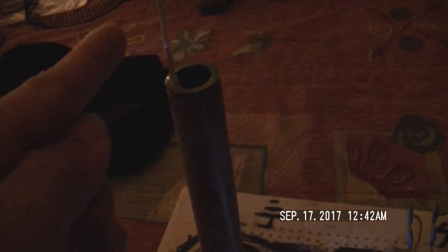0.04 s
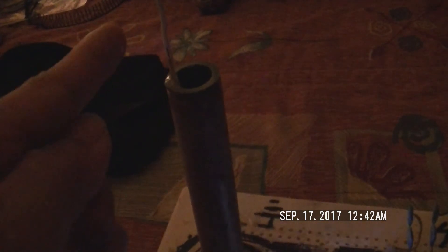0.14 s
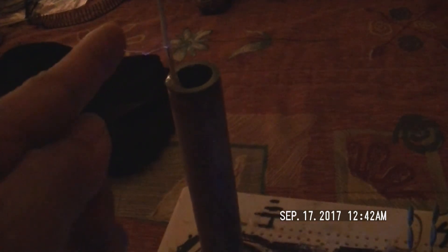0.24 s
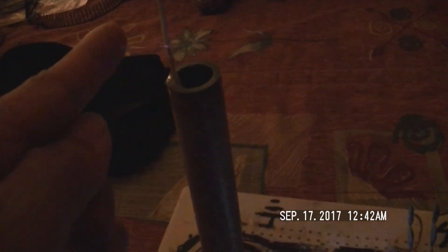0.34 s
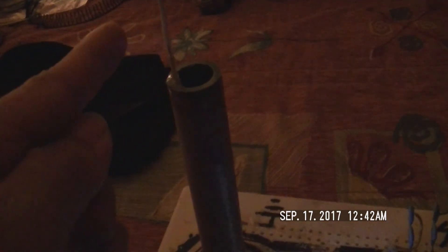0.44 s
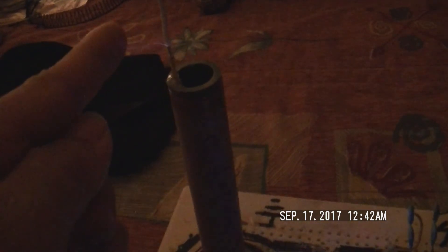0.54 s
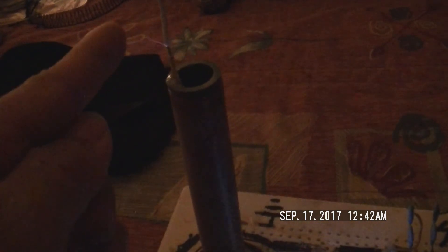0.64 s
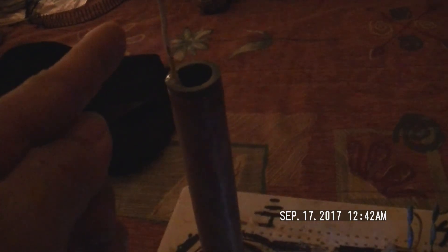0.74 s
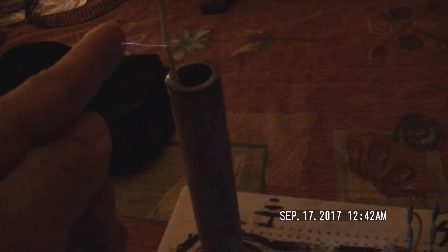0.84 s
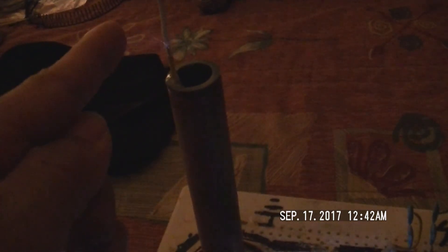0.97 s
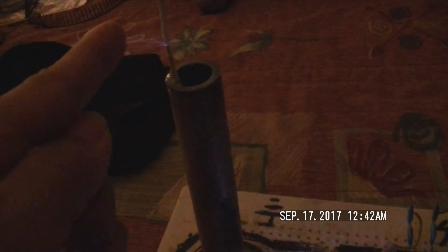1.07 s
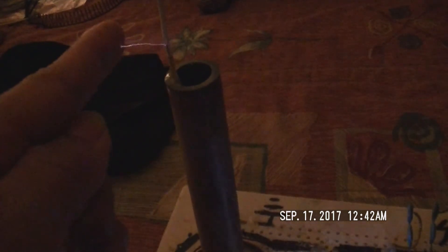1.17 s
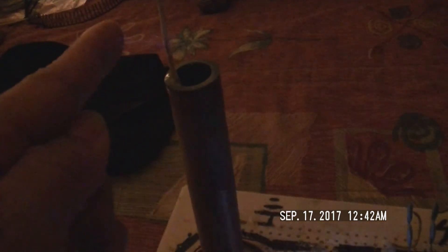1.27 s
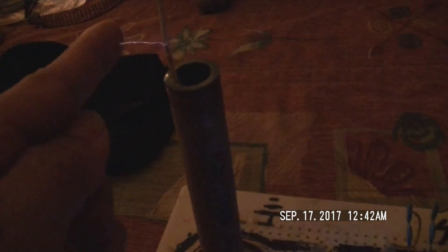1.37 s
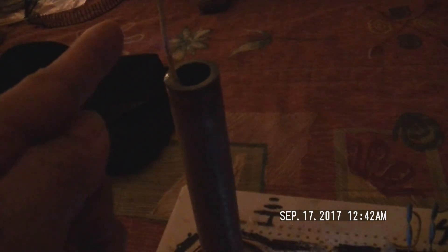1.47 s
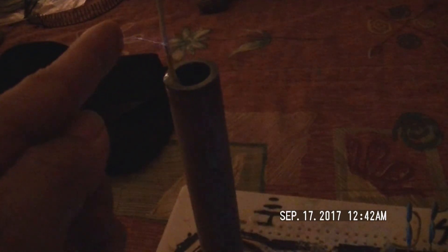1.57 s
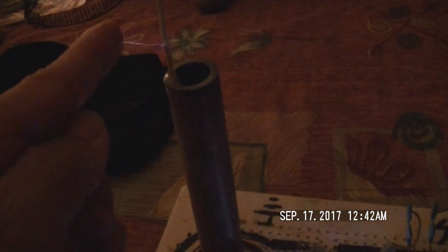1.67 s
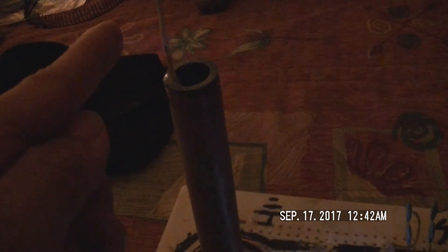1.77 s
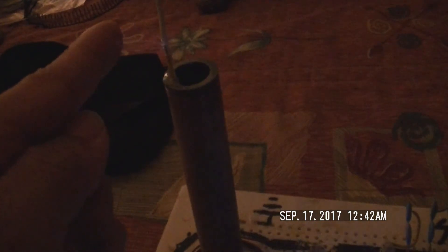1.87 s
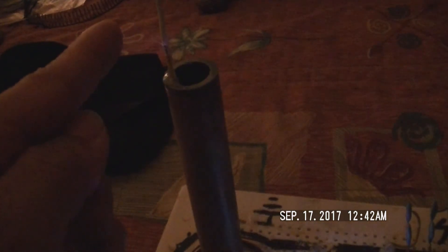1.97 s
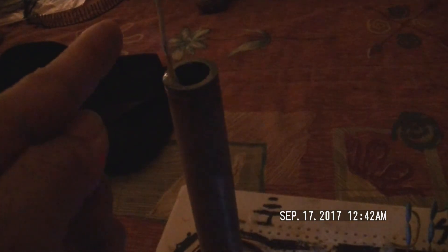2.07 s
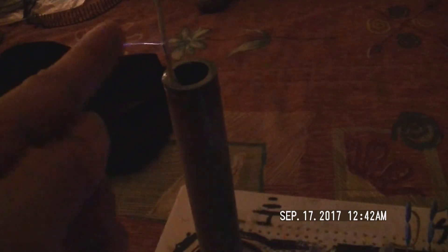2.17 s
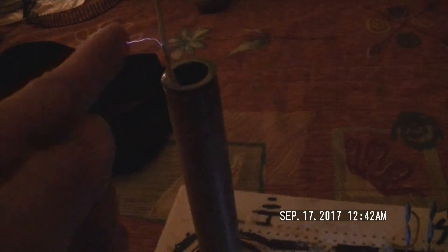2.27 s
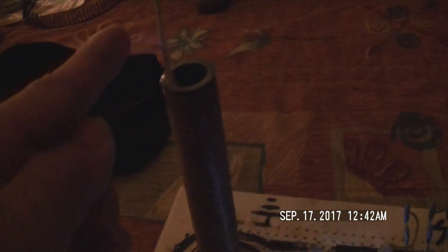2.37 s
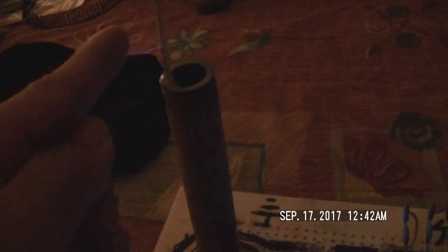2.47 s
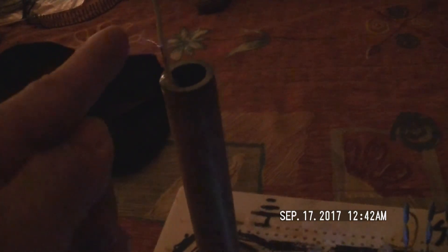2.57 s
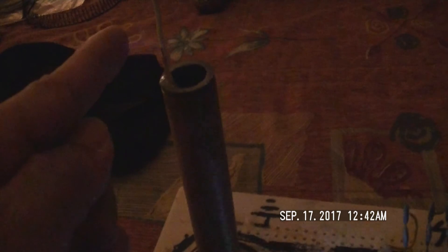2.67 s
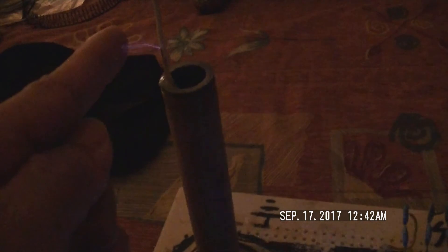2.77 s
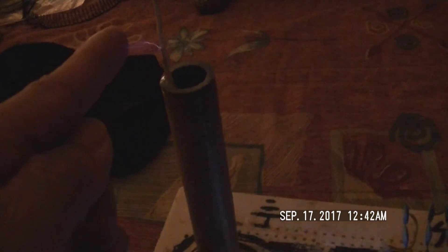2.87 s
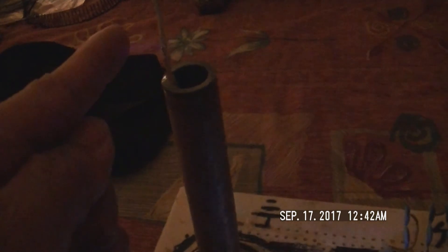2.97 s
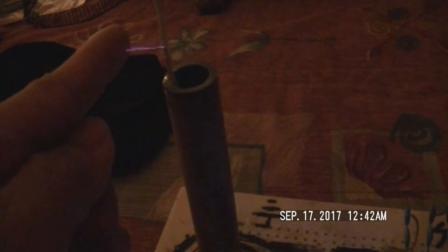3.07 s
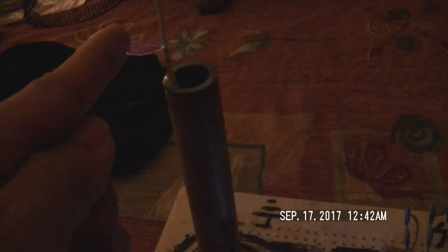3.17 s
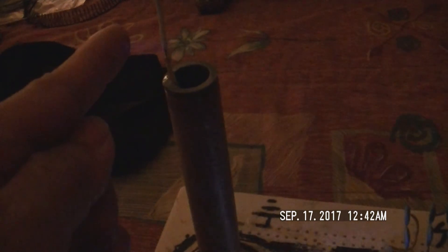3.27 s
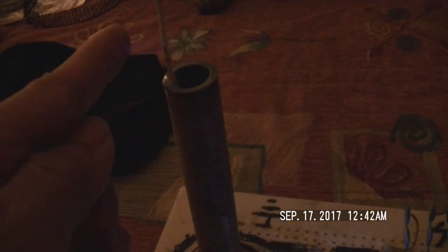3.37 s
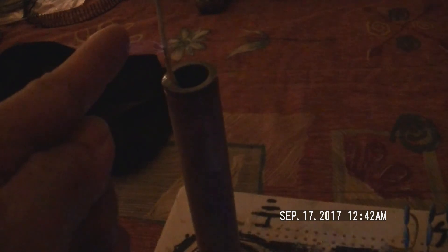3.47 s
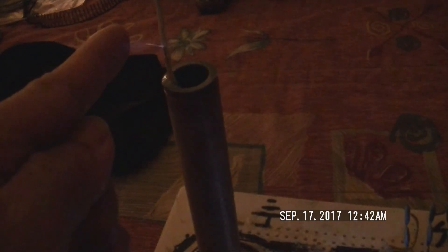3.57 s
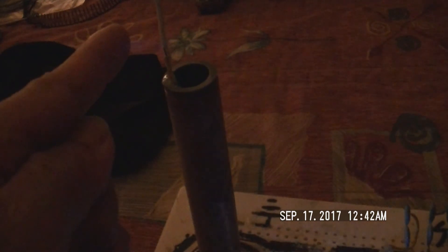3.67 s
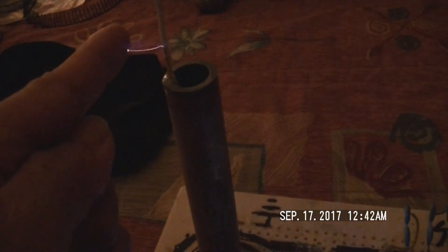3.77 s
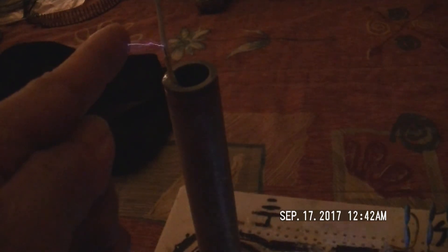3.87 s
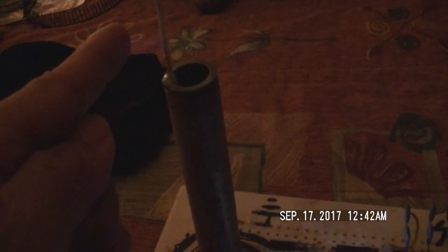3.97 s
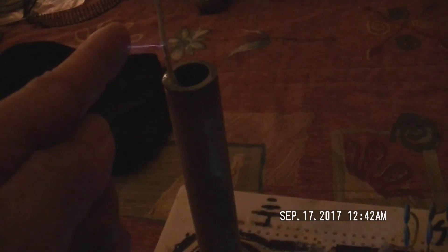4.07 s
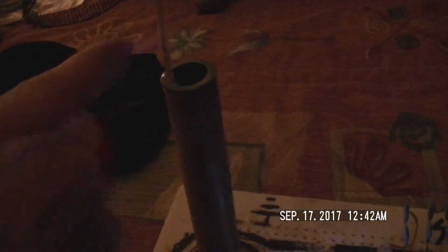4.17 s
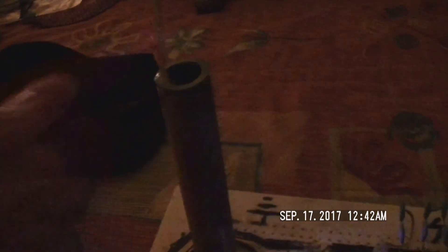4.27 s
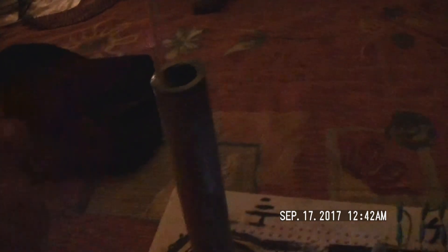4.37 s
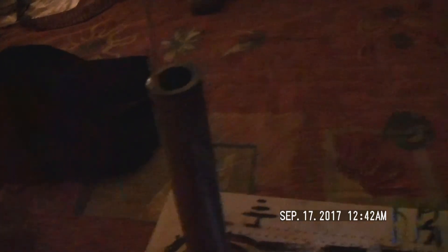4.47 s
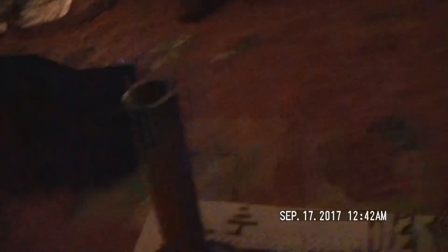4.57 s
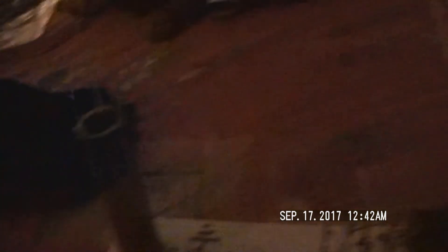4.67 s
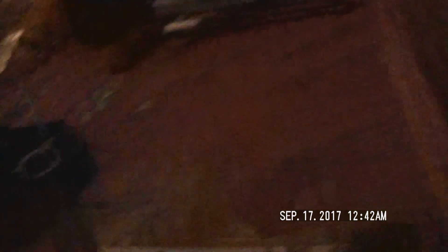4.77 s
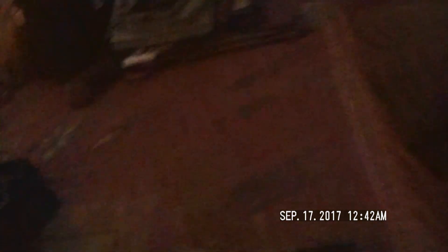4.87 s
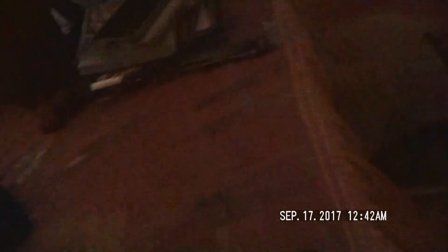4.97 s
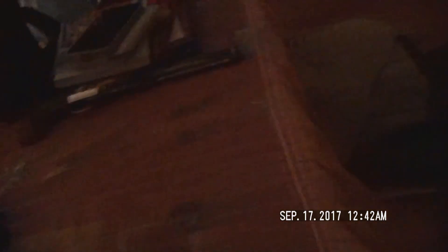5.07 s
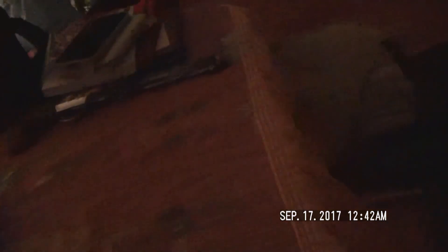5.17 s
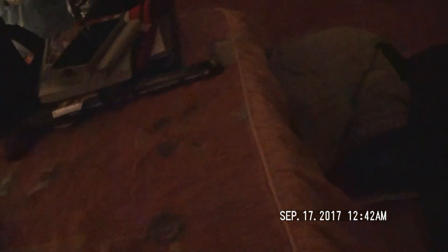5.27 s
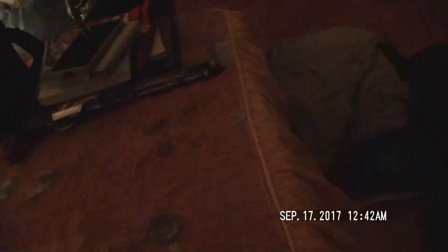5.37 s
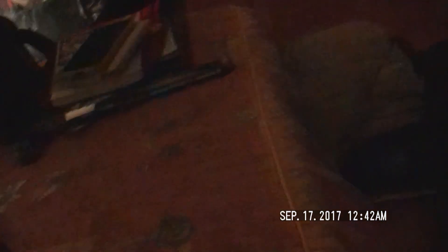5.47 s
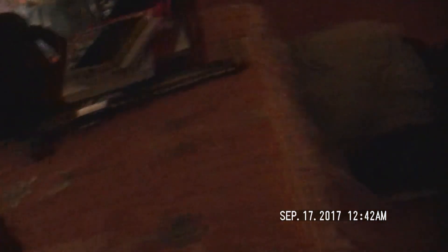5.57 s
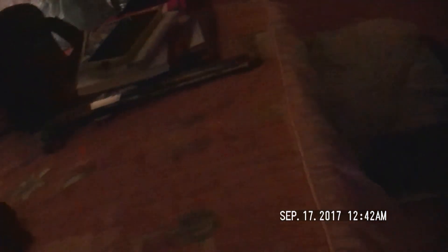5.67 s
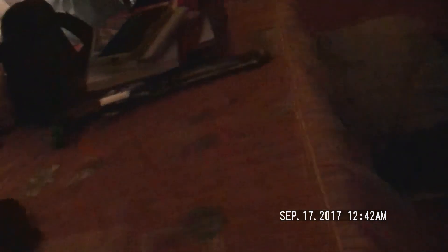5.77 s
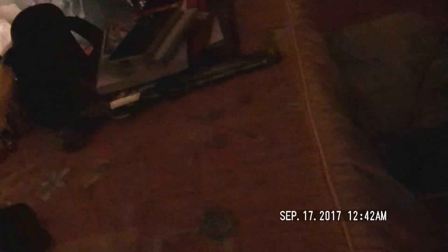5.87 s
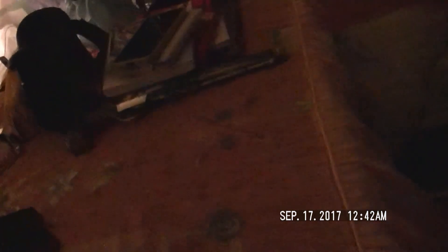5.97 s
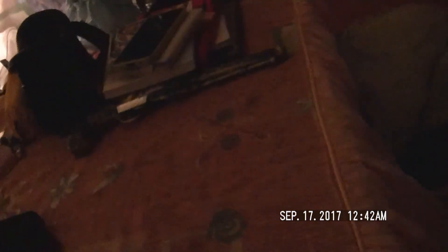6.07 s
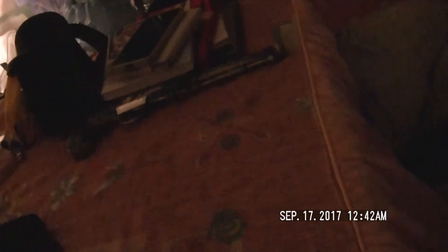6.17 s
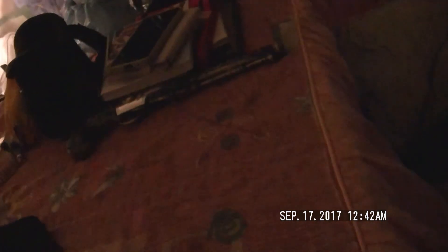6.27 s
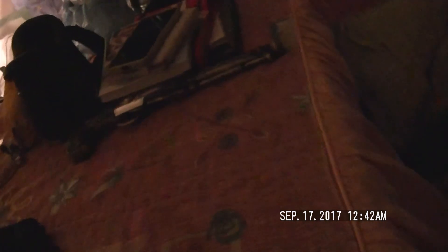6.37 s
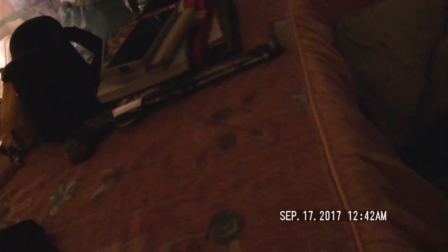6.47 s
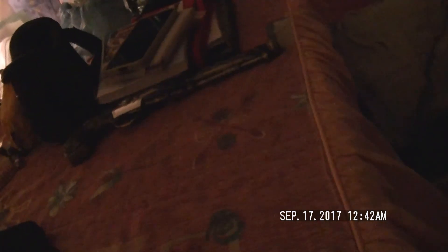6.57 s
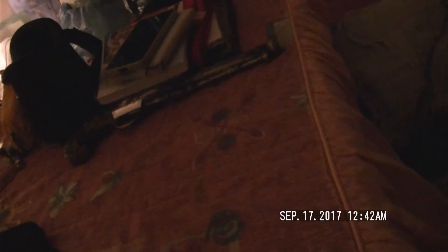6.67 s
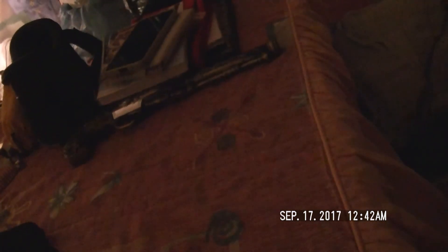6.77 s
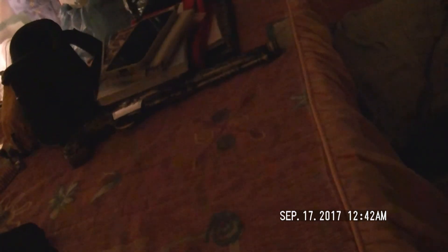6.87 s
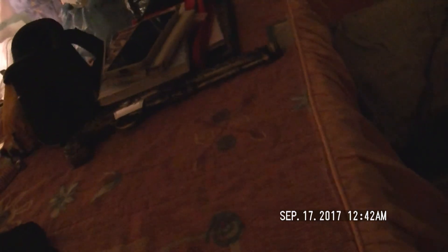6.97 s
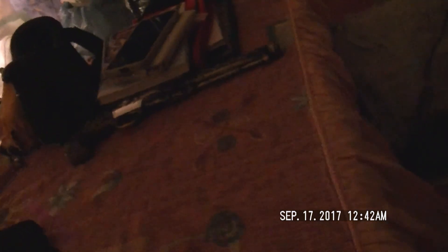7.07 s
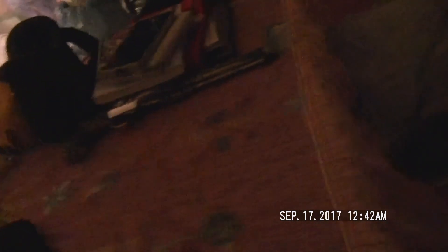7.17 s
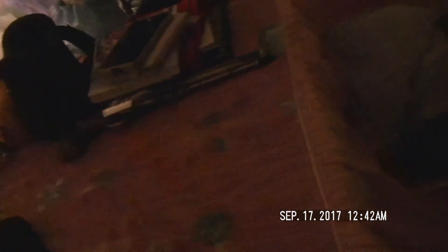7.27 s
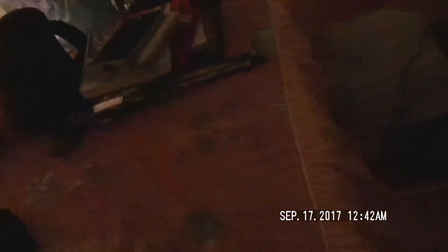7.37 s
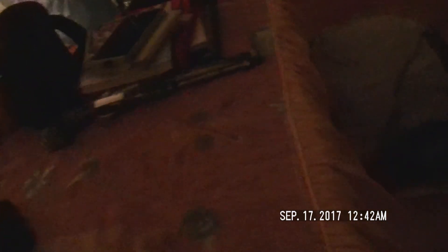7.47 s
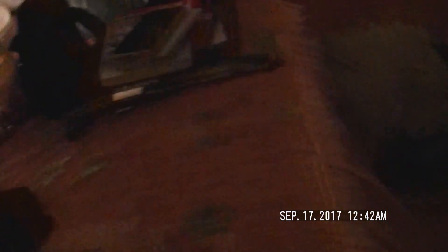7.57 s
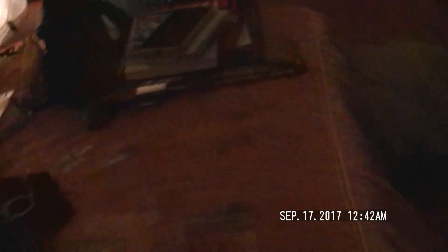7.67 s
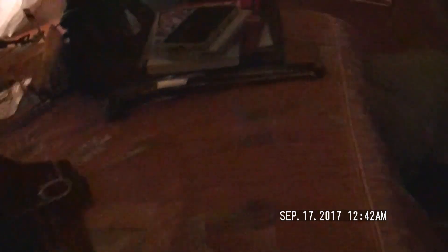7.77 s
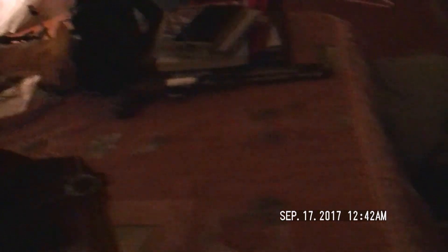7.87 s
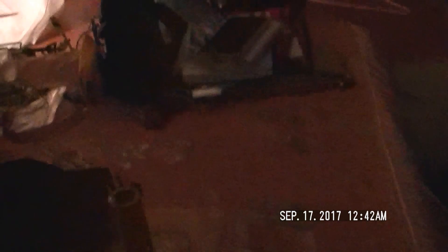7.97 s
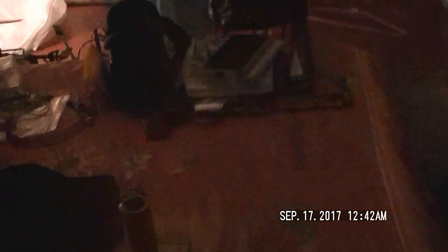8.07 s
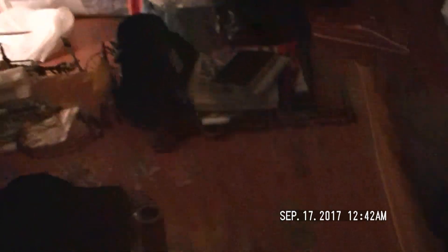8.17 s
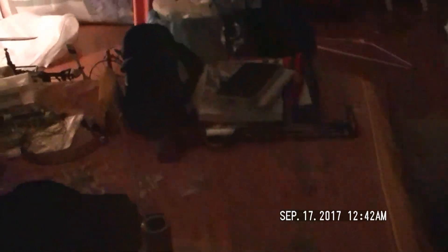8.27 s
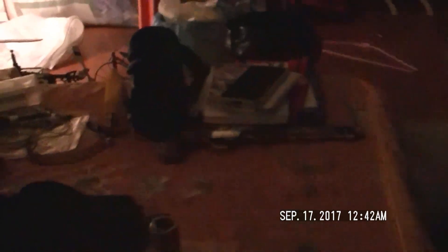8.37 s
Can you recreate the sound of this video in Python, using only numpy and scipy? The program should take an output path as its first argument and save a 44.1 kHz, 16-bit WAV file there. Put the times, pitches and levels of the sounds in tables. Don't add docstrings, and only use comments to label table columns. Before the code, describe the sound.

A steady electric arc rattles like a harsh, fast, treble-heavy zipper, each snap clicking crisply and bouncing off the table and walls. Faint low grip thumps sit underneath. As the camera microphone turns away the colour changes, lower body thinning. The arcing ends suddenly, its short room tail fades, and quiet room noise swells with low mains hum, a faint steady whine and a tiny tick and rub near the end.

```python
import sys
import numpy as np
from scipy import signal
from scipy.fft import rfft, irfft
from scipy.io import wavfile
from scipy.ndimage import uniform_filter1d

SR = 44100
rng = np.random.default_rng(int(sys.argv[2]) if len(sys.argv) > 2 else 0)


def magnitude_from_level(level_db):
    exponent = np.asarray(level_db, float) / 20
    return 10 ** exponent


def file_out(sig):
    cols = np.atleast_2d(sig).T
    lim = np.clip(cols, -1, 1)
    pcm = np.round(lim * 32767).astype(np.int16)
    wavfile.write(sys.argv[1], SR, pcm)


N = 371751
TIME = np.arange(N) / SR
SIZE = 2048
HZ = np.arange(SIZE // 2 + 1) * SR / SIZE

# (time [s], count [1])
FIRED = [(0.0216, 0), (0.1557, 5), (0.3207, 11), (0.5924, 21), (1.2639, 46), (1.4547, 53), (1.5888, 58),
         (2.1129, 77), (2.7662, 101), (3.5516, 130), (3.8527, 141), (3.9862, 146), (4.1805, 153),
         (4.784, 175), (5.112, 187), (6.4597, 236), (6.6289, 242), (6.6612, 243)]
# (time [s], heading [0-3.3], snap level [dB], left minus right [dB])
POSE = [
    (0, 0.84, 2, -1.5),
    (3.4, 0.82, 2.5, -1.5),
    (4.12, 0.78, 1.5, -1.5),
    (4.25, 1.14, 1.5, -1.5),
    (4.62, 1.02, 0.5, -2),
    (4.9, 1.55, 1.5, 1.5),
    (5.2, 1.86, 2, 1),
    (5.9, 1.9, 3.5, -4.5),
    (6.3, 2.96, 4, -1),
    (6.7, 3.3, 3.5, 0),
]
# (frequency [Hz], gain [dB])
FACING = [(250, -11.5), (700, -1), (1000, -5.5), (1500, -16.5), (2200, -6), (3200, 10), (6000, 8.5),
          (7300, 9), (9800, -3.5), (11200, 16.5), (12500, 12), (13600, 4), (15400, -3.5), (16500, -7.5)]


def curve(table, at=TIME):
    s, *columns = np.transpose(table)
    return [np.interp(at, s, c) for c in columns]


def shape(table, hz):
    f, v = np.transpose(table)
    return np.interp(np.log(np.maximum(hz, 1)), np.log(f), v)


def outside(t, start, end):
    return np.maximum(np.maximum(start - t, t - end), 0)


def unit(x):
    return x / np.sqrt(np.mean(x ** 2))


def band(x, lo_hz, hi_hz):
    return signal.sosfilt(signal.butter(2, [lo_hz, hi_hz], "band", fs=SR, output="sos"), x)


def coloured(x, table):
    n = x.shape[-1]
    return irfft(rfft(x) * magnitude_from_level(shape(table, np.arange(n // 2 + 1) * SR / n)), n)


def causal(db):
    c = irfft(db * np.log(10) / 20, axis=-1)
    c[..., 1:SIZE // 2] *= 2
    c[..., SIZE // 2 + 1:] = 0
    return np.exp(rfft(c, axis=-1))


def late(ms):
    return np.exp(-2j * np.pi * HZ * ms / 1000)


def resonance(centre_hz, width_hz):
    return 1 / (1 + 1j * (HZ ** 2 - centre_hz ** 2) / np.maximum(HZ, 1) / width_hz)


def lay(spectra, times):
    start = np.floor(times * SR).astype(int)
    fraction = (times * SR - start)[:, None]
    shift = np.exp(-2j * np.pi * np.arange(SIZE // 2 + 1) / SIZE * fraction)
    out = np.zeros(N + SIZE)
    np.add.at(out, start[:, None] + np.arange(SIZE), irfft(spectra * shift, axis=-1))
    return out[:N]


def breakdowns():
    s, count = np.transpose(FIRED)
    chance = rng.standard_normal((3, int(count[-1]) + 1))
    k = np.arange(chance.shape[1])
    times = np.interp(k, count, s) - .00015 + .0003 * chance[0] * (k < k[-1] - 1)
    return times, chance[1], chance[2]


def arc_colour(heading, facing, shrink):
    # (frequency [Hz], gain [dB])
    shifted = [(250, 3), (700, -7.5), (1000, 3.5), (1500, 2.5), (2200, 3), (3200, 8), (5900, 10.5),
               (6700, 16), (8000, 17.5), (10500, 16.5), (12000, 14.5), (13500, 3.5), (15200, 1),
               (16500, -17)]
    # (frequency [Hz], gain [dB])
    averted = [(250, -6.5), (450, -11.5), (820, -2.5), (1050, -5.5), (2000, 3), (3300, 1), (4500, -2.5),
               (6800, 1), (7500, 1), (8400, 13), (10500, 15.5), (12000, 8.5), (13500, 7.5), (15800, -5.5)]
    # (frequency [Hz], width [Hz], depth [dB])
    dips = [(950, 250, -6), (2200, 200, -13), (13600, 600, -11)]
    edge_glide, dip_glide, path_shrink = .08, .06, .165
    away = 1 - facing
    axes_hz = HZ, HZ * (1 - edge_glide * away), HZ * shrink / (1 - path_shrink)
    colour = 0
    for j, (table, hz) in enumerate(zip((FACING, shifted, averted), axes_hz)):
        share = np.clip(1 - np.abs(np.clip(heading, 0, 2) - j), 0, 1)
        colour = colour + share * shape(table, hz)
    dip_axis_hz = HZ * (1 - dip_glide * away)
    for f, width_hz, db in dips:
        colour = colour + facing * db / (1 + (2 * (dip_axis_hz - f) / width_hz) ** 2)
    knots = rng.standard_normal((len(heading), 17))
    scatter = np.array([np.interp(HZ, np.arange(17) * 1000., r) for r in knots])
    return colour + np.where(HZ > 13000, 2.2, .6) * scatter


def housing_path(facing):
    lead = .2 + .3 * facing
    holdback = -(lead + late(.19)) / (1 + lead * late(.19))
    return holdback * (1j * HZ / (150 + 1j * HZ)) ** 2


def near_echoes(facing):
    # (delay [ms], share [1, minus = inverted])
    near = [(1.55, .09), (1.82, -.07), (2.06, .05), (2.48, .06)]
    table_top = sum(share * late(ms) for ms, share in near)
    return facing * table_top - (1 - facing) * 0.085 * late(0.412) * (HZ > 7000)


def clutter_and_bounces(at, shrink):
    # (from [s], until [s], extra path before the swing [ms], level [dB])
    surfaces = [
        (0, 4.75, .785, -10),
        (4.9, 5.6, 1.44, -14),
        (6.05, 7, 1.9, -15.5),
    ]
    fade_db_per_s2 = 90
    clutter_ms = np.sort(rng.uniform(1, 4.2, 14))
    total = 0
    for j, ms in enumerate(clutter_ms):
        total = total + (-1) ** j * magnitude_from_level(-22 - 5 * ms) * late(ms * shrink)
    for start, end, ms, db in surfaces:
        level = magnitude_from_level(db - fade_db_per_s2 * outside(at, start, end) ** 2)
        total = total - level * late(ms * shrink)
    return total


def streamers(snap):
    # (time [s], level [dB])
    early = [(1.1255, -32.0), (1.3439, -37.0), (1.4506, -34.0), (2.6819, -29.0), (2.8186, -36.0),
             (3.0065, -28.0), (3.494, -29.0), (4.2886, -36.0), (4.4228, -33.0), (4.4803, -37.0),
             (4.7244, -36.0)]
    s, db = np.transpose(early)
    return lay(magnitude_from_level(db[:, None] + 14) * snap * resonance(6800, 3000), s)


def room_answer():
    # (frequency [Hz], T60 [s])
    t60 = [(300, 0.5), (2000, 0.74), (6000, 0.34), (12000, 0.24)]
    # (delay [ms], level [dB])
    arrival = [(0, -26), (3, -12), (5, -7), (8, -11), (13, 3), (17, -7), (22, -1.5), (30, -5)]
    # (delay [ms], level [dB])
    walls = [(9.4, -23.5), (10.9, 4), (13.1, -35.5), (15.9, -4), (16.3, -5), (17.4, 0.5), (18.3, -22.5),
             (18.9, -17.5)]
    # (frequency [Hz], gain [dB])
    room_colour = [(100, -17.5), (1000, -13.5), (2500, -3.5), (5000, -2), (8000, 3.5), (11000, -1),
                   (13000, -3.5), (15500, -4.5), (16000, -33.5)]
    t = np.arange(SR // 2) / SR
    tail = 0
    for hz in 125 * 2 ** np.arange(0, 7.):
        top_hz = min(hz * np.sqrt(2) * (1 + (hz > 7000)), .45 * SR)
        noise = band(rng.standard_normal((2, len(t))), hz / np.sqrt(2), top_hz)
        tail = tail + noise * magnitude_from_level(-60 * np.maximum(t - .03, 0) / shape(t60, hz))
    tail = tail * magnitude_from_level(curve(arrival, t * 1000)[0])
    for ms, db in walls:
        tail[0, int(ms * SR / 1000)] += magnitude_from_level(db) * 2
    mid, side = coloured(tail, room_colour)
    side = magnitude_from_level(-8) * band(side, 6000, 13000)
    return np.array([mid + side, mid - side])


def room(times, kick_db):
    kicks = np.zeros(N)
    kicks[(times * SR).astype(int)] = magnitude_from_level(kick_db)
    kicks[0] = kicks.max()
    turn = np.pi / 2 * curve(POSE)[0] + 0.21 * TIME
    weights = np.cos(turn), np.sin(turn)
    return sum(signal.fftconvolve((kicks * w)[None], room_answer())[:, :N] for w in weights)


def sparks():
    times, strength_chance, top_chance = breakdowns()
    at = times[:, None]
    heading, db, pan_db = (c[:, None] for c in curve(POSE, times))
    facing = np.clip(2 - heading, 0, 1)
    swing_s, settle_s, path_shrink = 4.62, .7, .165
    shrink = 1 - path_shrink * (1 - np.exp(-np.maximum(at - swing_s, 0) / settle_s))

    strength_db = db + .7 * strength_chance[:, None] - 11
    top_db = .5 * heading + 0.86 * top_chance[:, None]
    tilt_db = top_db * np.clip((HZ - 10500) / 2500, 0, 1)
    holdback = housing_path(facing)
    direct = causal(arc_colour(heading, facing, shrink) + tilt_db + strength_db) * holdback
    front = magnitude_from_level(strength_db) * causal(shape(FACING, HZ) - 4 * HZ / 10000) * holdback
    mid = lay(direct * (1 + near_echoes(facing)) + front * clutter_and_bounces(at, shrink), times)

    unlike = pan_db / 17.4 - 1j * (2 * facing - 1) * magnitude_from_level(-33)
    side = lay(direct * resonance(8700, 3000) * unlike, times)
    kick_db = -30.5 + 1.49 * heading[:, 0] + .5 * strength_chance - 13.0
    return mid + streamers(direct[0]) + side * np.array([[1], [-1]]) + room(times, kick_db)


def handling():
    # (time [s], level [dB], hold [s])
    rumble = [
        (2.52, -62, .03),
        (2.595, -63, .015),
        (3.058, -60, .03),
        (3.177, -60, 0.044),
        (3.27, -60.5, 0.058),
        (3.376, -59, .03),
        (3.528, -63, .02),
        (3.947, -68, .015),
    ]
    # (time [s], level [dB], length [s])
    rustle = [
        (7.66, -69, .04),
        (7.76, -70, .04),
        (8.157, -61, .004),
        (8.163, -66, .05),
        (8.274, -78, 0.023),
    ]
    edge_s = 0.018
    grip = unit(band(rng.standard_normal((2, N)), 33.07, 190))
    press = sum(magnitude_from_level(d) * np.exp(-outside(TIME, s, s + hold) / edge_s) for s, d, hold in rumble)
    grip = (grip[0] + .8 * grip[1] * np.array([[1], [-1]])) * press
    swell = sum(magnitude_from_level(d) * (TIME > s) * np.exp(-np.abs(TIME - s) / length) for s, d, length in rustle)
    shake_db = 4 * unit(band(rng.standard_normal(N), 2, 9.3))
    sway = magnitude_from_level(-79.0 + shake_db) * unit(band(rng.standard_normal((2, N)), 28, 89))
    return grip + sway + swell * unit(band(rng.standard_normal(N), 4500, 11000))


def gain_control():
    ducked_db, freed_db, release_s, creep_db_per_s = -10, 1.5, 0.067, 0.46
    since = np.maximum(TIME - FIRED[-1][0], 0)
    held = np.exp(-(since / release_s) ** 2 / 2)
    return magnitude_from_level(freed_db + creep_db_per_s * since + (ducked_db - freed_db) * held)


def motor_whine(lift):
    # (time [s], lower line [dB], upper line [dB])
    lines = [
        (6.8, -74, -68.5),
        (6.972, -69, -70.5),
        (7.27, -72, -69.5),
        (8.028, -62.5, -68),
        (8.43, -62, -68),
    ]
    lines_hz = (643.4, 701.8)
    free_s = lines[0][0]
    duck = np.where(TIME < free_s, lift / lift[int(free_s * SR)], 1)
    tones = sum(magnitude_from_level(db + 11.5) * np.sin(2 * np.pi * hz * TIME) for hz, db in zip(lines_hz, curve(lines)))
    return tones * duck


def mains_hum():
    # (frequency [Hz], level [dB])
    lines = [(59, -77), (118.5, -72), (188, -70), (227, -69), (585, -73), (761, -74), (1113, -82)]
    wobble = uniform_filter1d(rng.standard_normal((len(lines), N)), 3000) * np.sqrt(3000)
    hum = 0
    for (hz, db), w in zip(lines, wobble):
        hum = hum + magnitude_from_level(db + 3 + 2.5 * w) * np.sin(2 * np.pi * hz * TIME + .8 * w[::-1])
    return hum


def room_hush():
    # (frequency [Hz], density [dB per Hz])
    hush_colour = [(15, -53), (25, -28), (206, -3.5), (451, -8), (591, -8), (641, -1.5), (695, -6),
                   (775, -5), (1040, -9), (1440, -7.5), (1650, -11), (3250, -15), (6210, -27.5),
                   (13600, -38.5), (15600, -43), (16000, -71.5)]
    side_colour = [(30, 1), (80, -4), (160, -11), (500, -20), (2500, -24), (6000, -12), (12000, -12)]  # (Hz, dB)
    mid, side = coloured(rng.standard_normal((2, N)), hush_colour)
    scale = magnitude_from_level(-59) / np.std(band(mid, 867, 16000))
    side = coloured(side, side_colour)
    return scale * np.array([mid + side, mid - side])


def background():
    lift = gain_control()
    return (room_hush() + mains_hum()) * lift + motor_whine(lift)


def scene():
    return sparks() + handling() + background()


def band_limit(x):
    return signal.sosfilt(signal.butter(12, 16970, fs=SR, output="sos"), x)


def record(dry):
    cut = signal.sosfilt(signal.ellip(8, .3, 60, 16500, fs=SR, output="sos"), dry)
    return band_limit(cut)


dry = scene()
out = record(dry)
file_out(out)
```